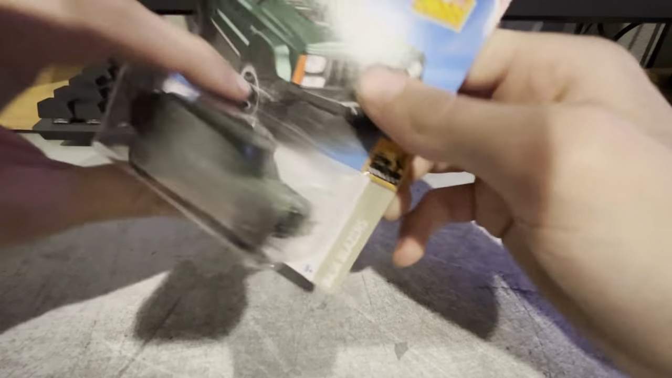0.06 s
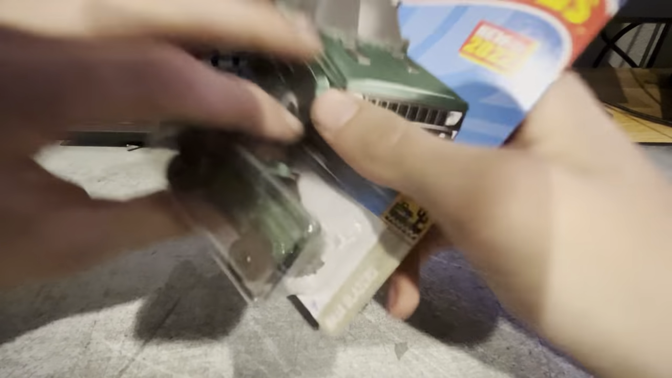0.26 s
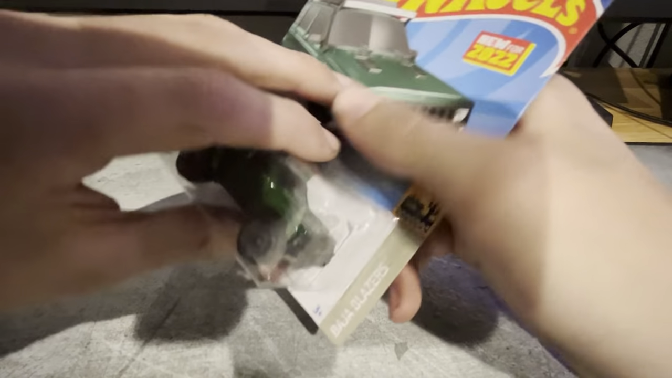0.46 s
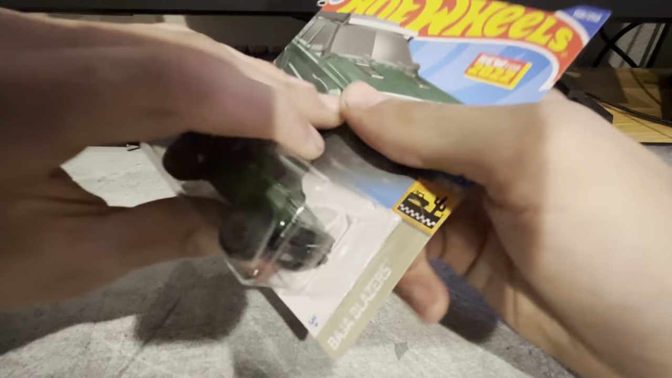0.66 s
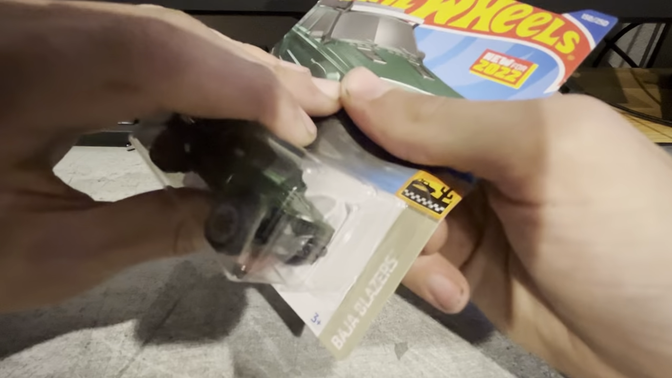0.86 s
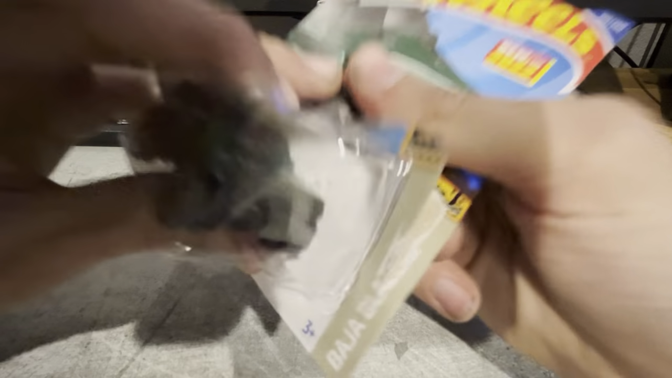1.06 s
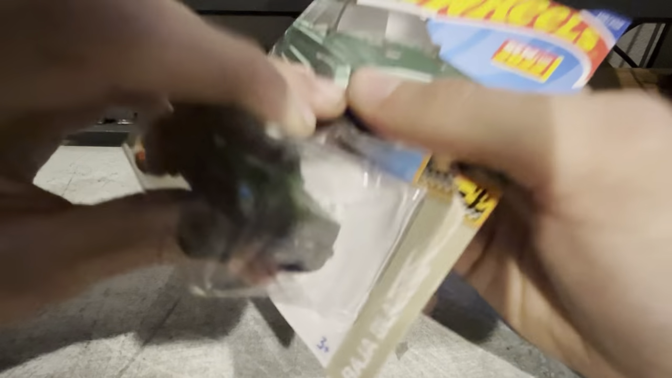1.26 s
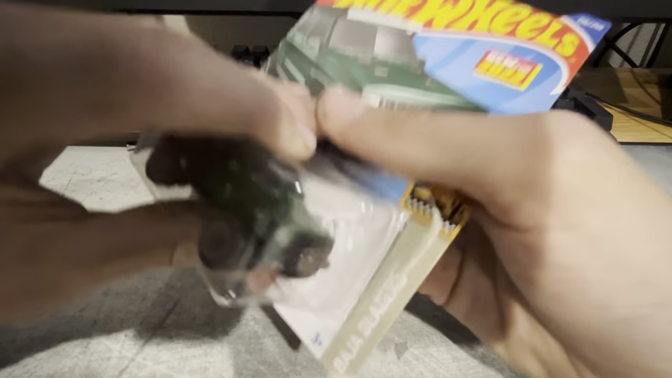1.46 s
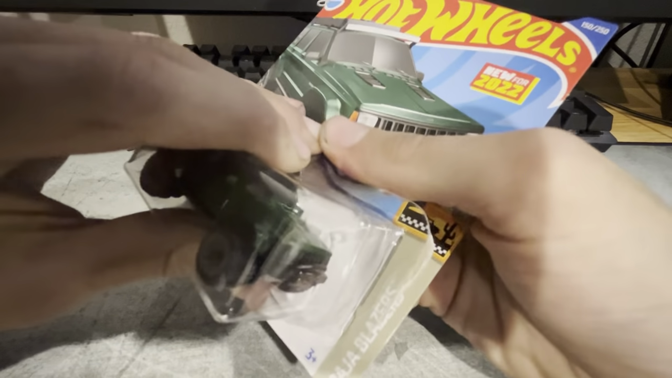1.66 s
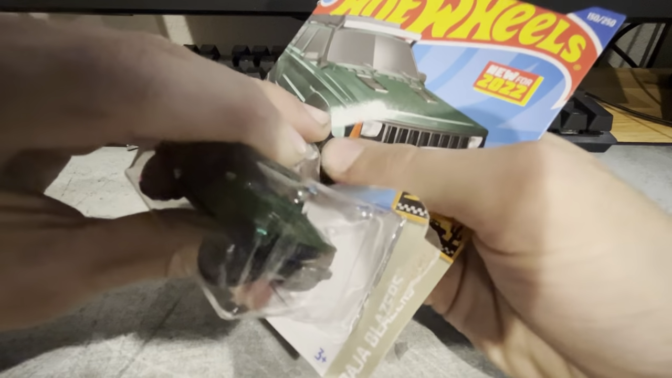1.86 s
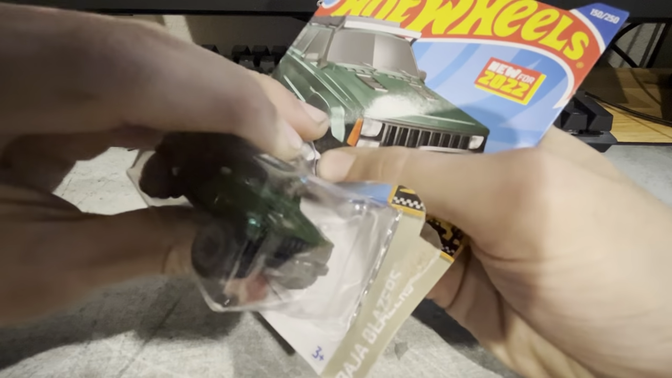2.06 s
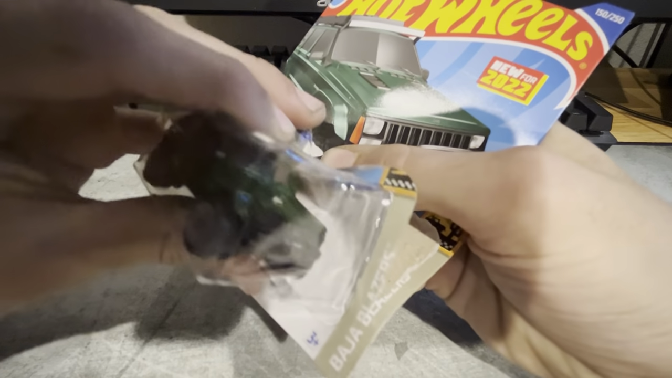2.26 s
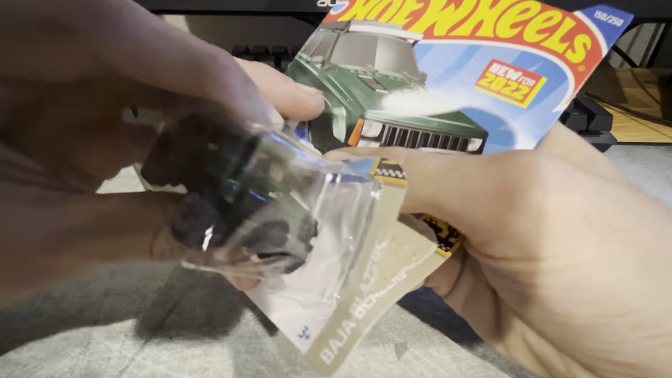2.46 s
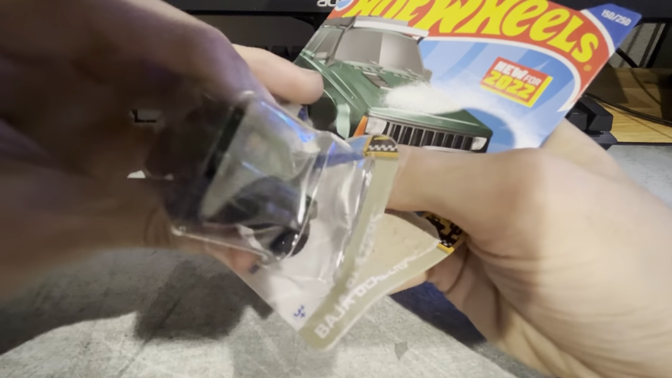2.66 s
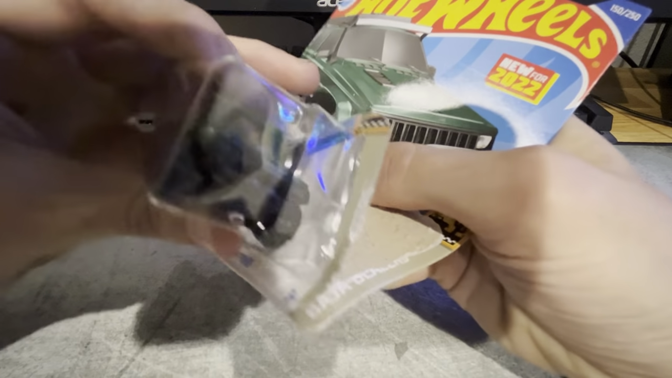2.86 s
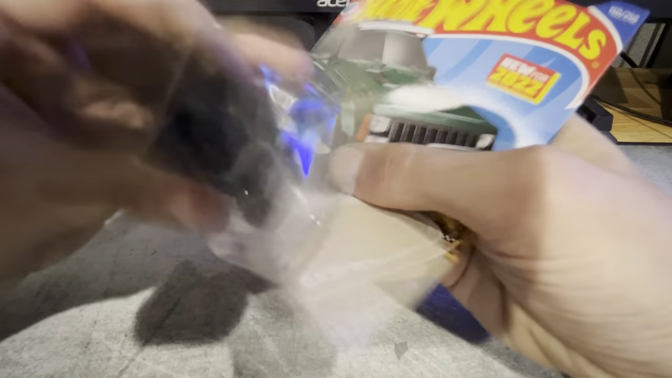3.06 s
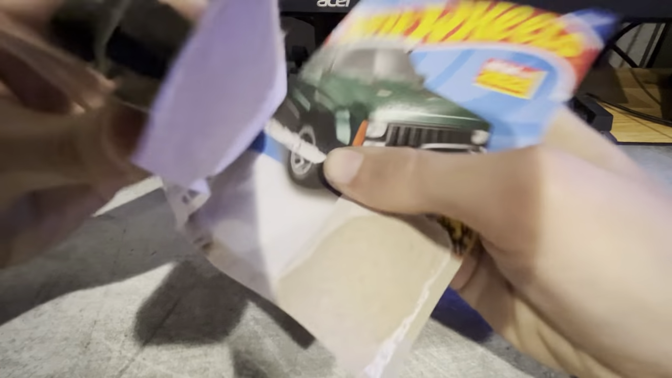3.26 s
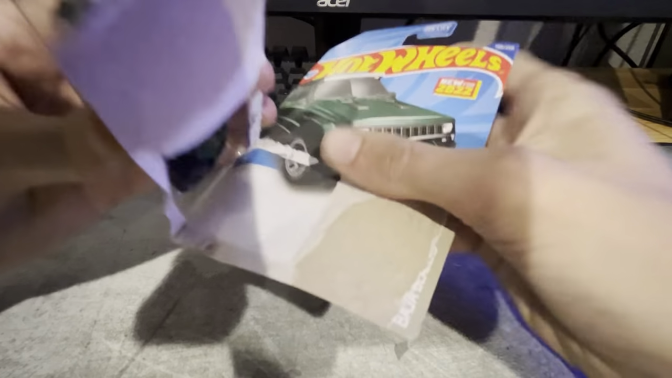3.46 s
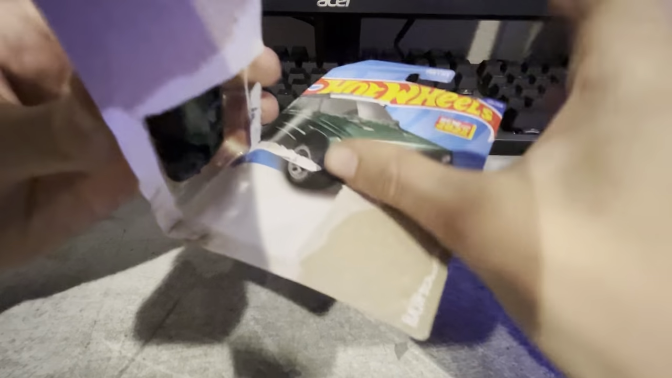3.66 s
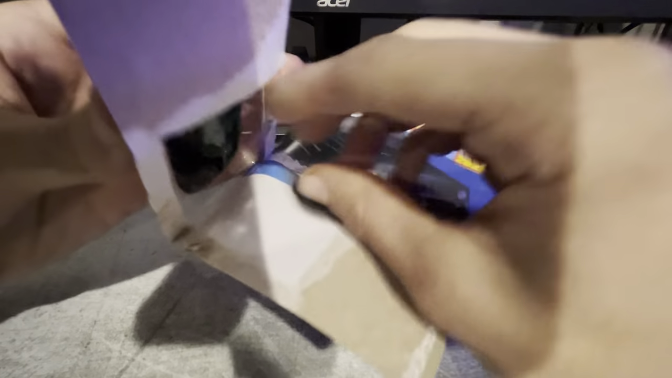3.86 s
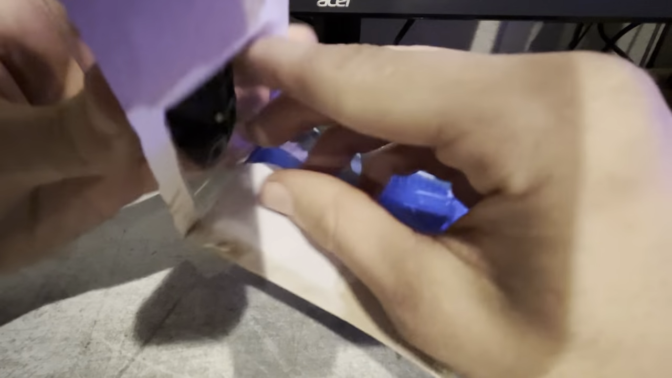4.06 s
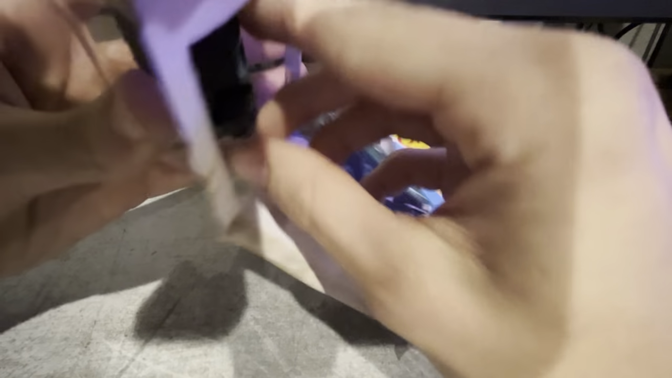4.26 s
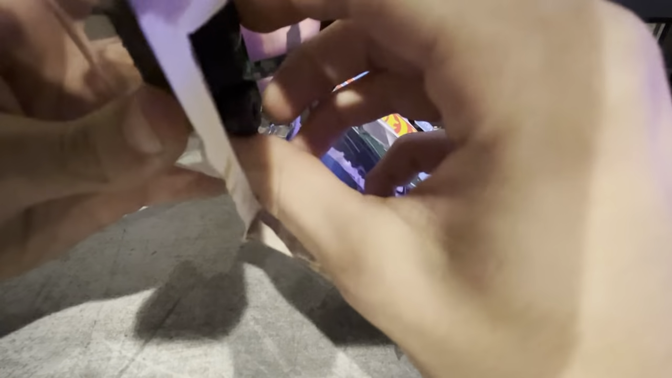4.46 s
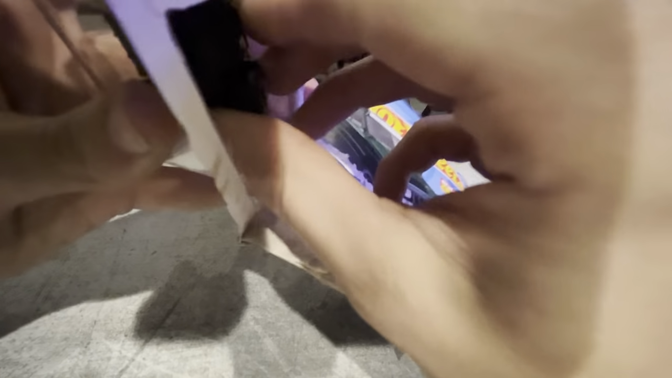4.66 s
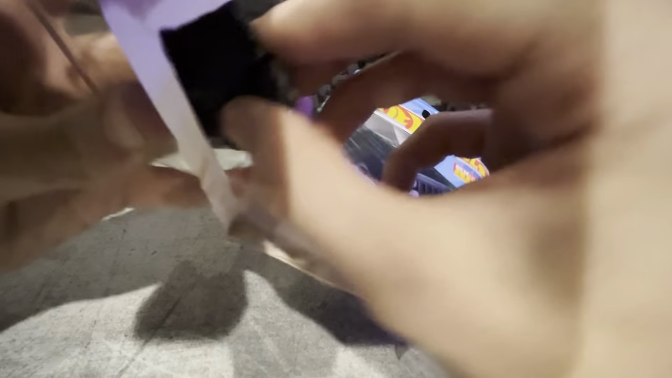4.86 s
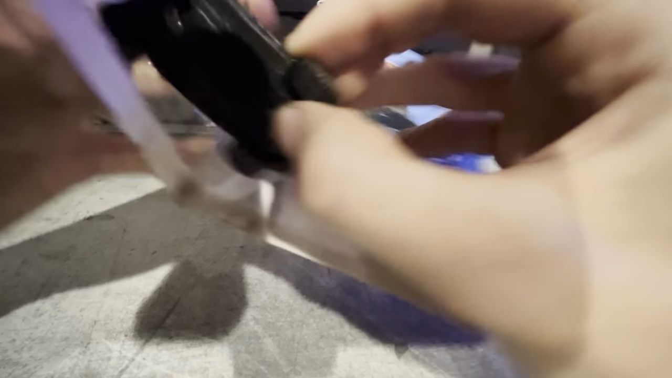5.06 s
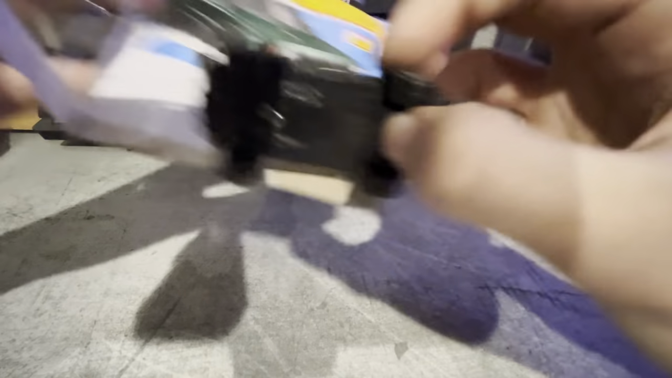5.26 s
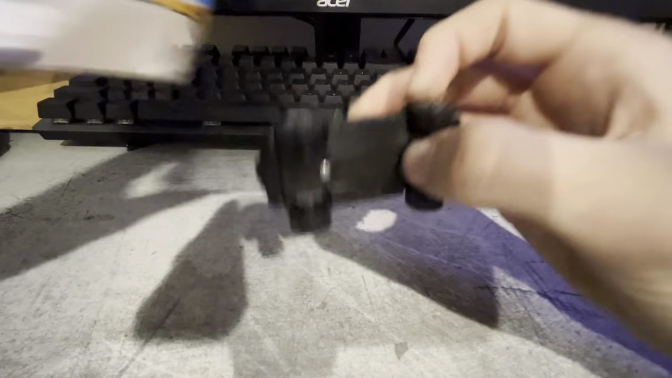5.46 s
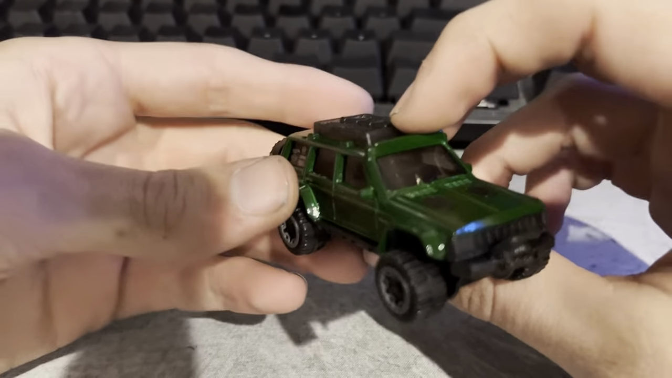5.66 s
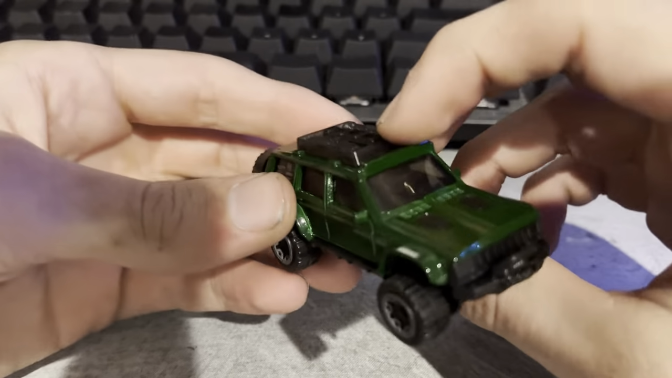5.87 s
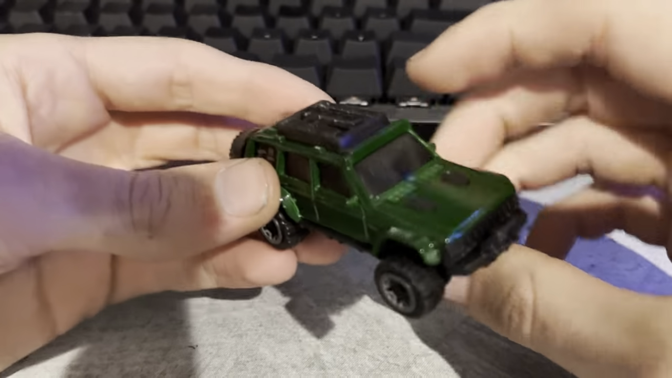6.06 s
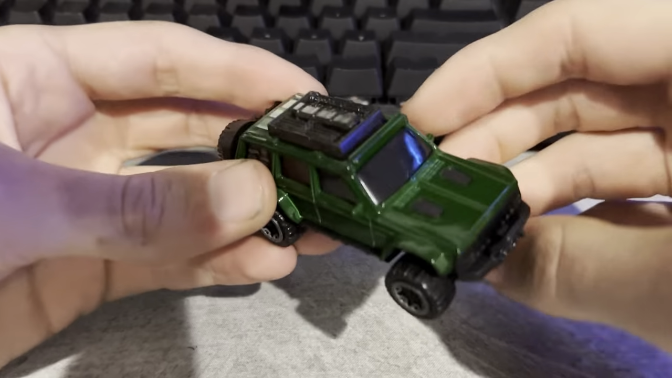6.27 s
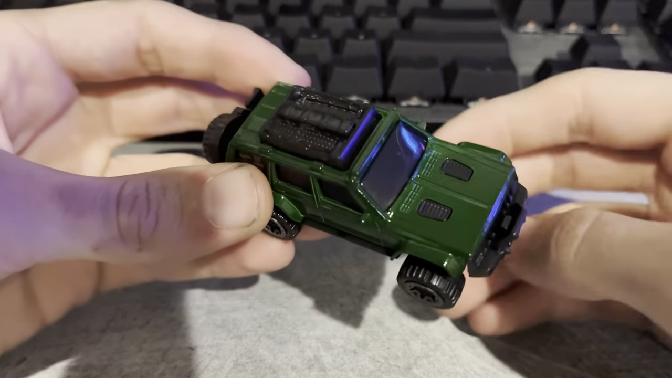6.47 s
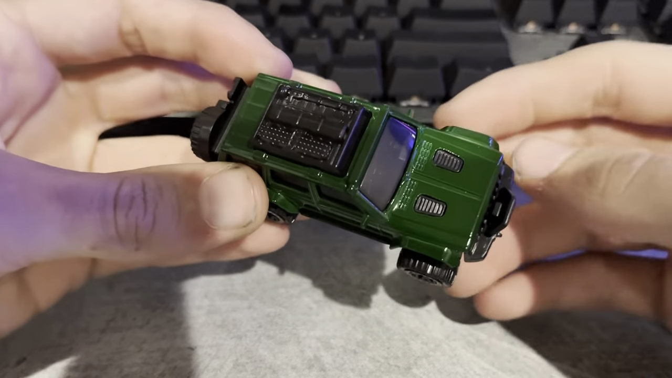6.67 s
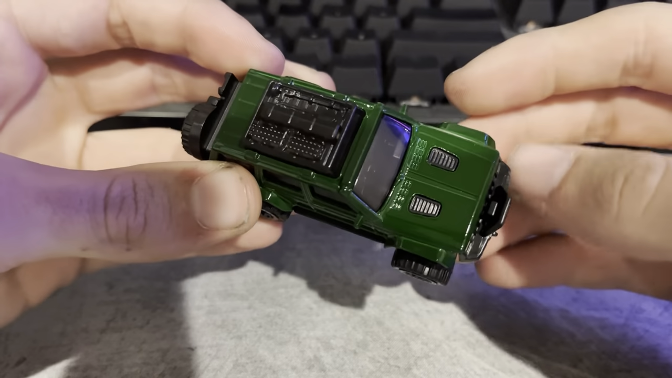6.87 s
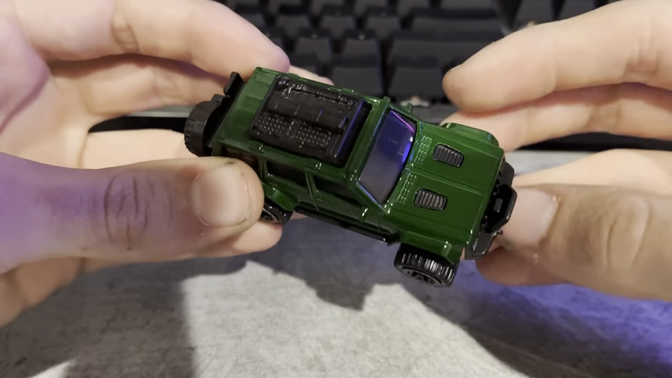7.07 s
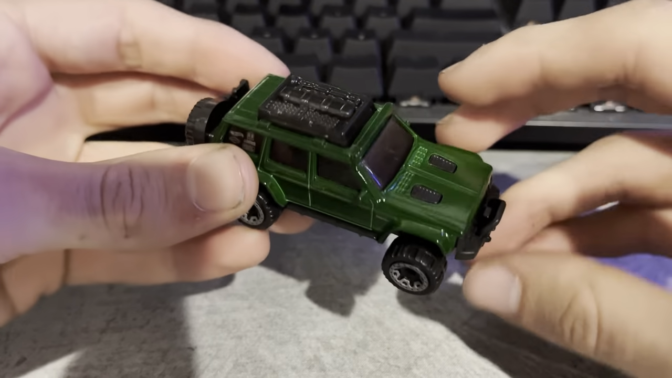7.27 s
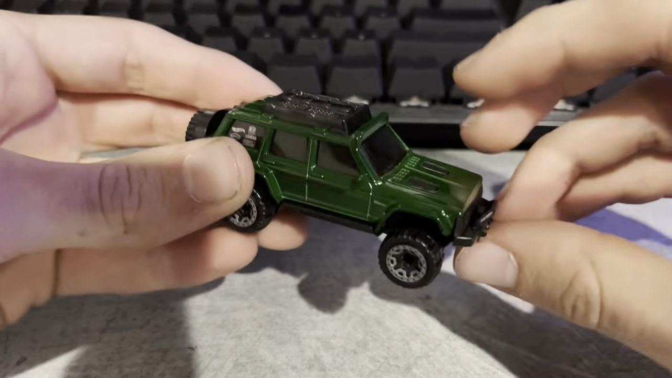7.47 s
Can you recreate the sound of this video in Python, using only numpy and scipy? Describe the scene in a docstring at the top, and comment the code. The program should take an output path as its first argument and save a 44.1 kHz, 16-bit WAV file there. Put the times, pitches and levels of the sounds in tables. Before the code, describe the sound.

Close up at a desk in a quiet room, hands rub and flex a stiff plastic blister on card. Crackles begin around one second, peak in loud snaps and a rip near three seconds, then come as scattered pops with rustling until five. Soft low knocks sit beneath. After a tiny dip in level, a small toy car is turned almost silently, with faint ticks and a light wheel rattle.

```python
"""First fingers rub a plastic blister pack and rip its glue seam: noise grains drive moving shell and card modes.
Over this come knocks with a sagging pitch and snaps: flurries of noise slips ringing a stiff shell and a dull card.
Around 5.6 s the level dips briefly; then a small toy is turned in the fingers, with soft touches, ticking axles
and a rattling wheel, while a few faint snaps go on. From start to end a quiet room rumbles and hisses below
a very faint steady tone. The near sources reach two microphone ports and leave a short dull tail."""
import sys
import numpy as np
from scipy import signal
from scipy.fft import rfft, irfft, next_fast_len
from scipy.io import wavfile
from scipy.ndimage import uniform_filter1d

SR = 44100
rng = np.random.default_rng(int(sys.argv[2]) if len(sys.argv) > 2 else 0)


def log_audio(samples):
    """Write samples as a 16-bit WAV file to the path given in sys.argv[1]."""
    # one column per channel
    frames = np.atleast_2d(samples).T
    # limit to full scale, then quantise
    limited = np.clip(frames, -1, 1)
    pcm = np.round(limited * 32767).astype(np.int16)
    wavfile.write(sys.argv[1], SR, pcm)


N = 331091  # length [samples]

# creases giving way: (flurry peak time [s], crack level [dB], card level [dB], main card mode [Hz],
# fizz level [dB], left minus right of crack and card [dB], flurry stretch [x 0.96 ms, held to 0.2-6])
SNAPS = [(0.454, -57, -40, 480, -92, -8, 0.92), (0.7248, -35, -64, 1030, -33.5, 6.5, 1.14),
         (0.9079, -56, -51, 828, -36.5, -0.5, 6.2), (1.0062, -9.5, -24.5, 1232, -10.5, -21.5, 2.3),
         (1.034, -31.5, -12.5, 814, -49, 4, 0.58), (1.0612, -35, -33, 1220, -30, -4.5, 2.9),
         (1.1713, -21.5, -16.5, 790, -75, 4, 0.93), (1.1781, -16.5, -80, 796, -13.5, 2, 0.63),
         (1.2785, -50, -32.5, 830, -55, -12, 2.6), (1.3438, -33.5, -23, 860, -38.5, 0, 4.4),
         (1.361, -27, -17.5, 770, -76, -2, 1.3), (1.3906, -40, -19, 846, -73, -5, 1.8),
         (1.4486, -41, -36, 905, -47, -6, 1.5), (1.4755, -23.5, -15.5, 900, -45, -1, 1.1),
         (1.4813, -21, -19, 900, -23, -7, 0.77), (1.4869, -16.5, -18.5, 813, -34, 12, 0.78),
         (1.66, -40, -20, 820, -42, -4.5, 1.5), (1.6994, -32.5, -35, 740, -31.5, 3, 2.2),
         (1.7054, -44, -15, 810, -33, -11, 0.24), (1.753, -30, -53.5, 700, -41, -0.5, 0.96),
         (1.769, -27, -28, 1055, -34, -6, 1.2), (1.7895, -13.5, -21.5, 1170, -19.5, -5, 0.4),
         (1.795, -20.5, -22, 720, -18.5, -2, 2.4), (1.882, -23, -14.5, 676, -26.5, -4, 1.3),
         (1.991, -40, -60, 1360, -34.5, 4, 3.5), (2.0512, -37, -40, 1410, -24.5, 5, 1.7),
         (2.097, -37, -42, 470, -45, -7, 1.5), (2.107, -41, -39, 900, -41, -3, 1.1),
         (2.146, -41, -48, 900, -36, -6, 3.7), (2.173, -55, -41, 470, -50, -11, 1.2),
         (2.2025, -35.5, -37, 1190, -39, -3.5, 1.8), (2.2235, -35, -49, 1340, -31, 3, 0.97),
         (2.25, -43, -45, 1100, -33, 14, 0.33), (2.266, -42, -42, 440, -44, -5, 1.5),
         (2.2818, -44, -47, 820, -28, 17, 1.7), (2.297, -42, -50, 900, -30.5, -2, 1.1),
         (2.329, -37, -51, 1000, -36, -7, 1.8), (2.358, -37, -40, 1050, -34, -4, 1.6),
         (2.3728, -33, -39, 1030, -40, -12, 0.83), (2.3851, -47, -34, 1050, -31, -7, 0.35),
         (2.413, -57, -63, 900, -36, 0, 0.54), (2.54, -32, -28.5, 440, -37, 28, 9),
         (2.5474, -15, -24.5, 500, -22.5, -1, 0.67), (2.561, -21, -28, 876, -20.5, -4, 1.2),
         (2.6087, -16.5, -35.5, 389, -17, 1, 2.2), (2.72, -42, -36, 1050, -52, -3.5, 2.3),
         (2.739, -52, -44, 1000, -43, 2.5, 1.1), (2.766, -39, -46, 1000, -36, 0, 1.1),
         (2.778, -31, -49.5, 1000, -38, 12, 1), (2.7888, -36, -46.5, 1035, -35, -8, 6.8),
         (2.8294, -10, -10.5, 959, -26, -1.5, 1.15), (2.908, -36.5, -51, 900, -34.5, 12, 1),
         (2.9854, -15.5, -13, 1173, -23.5, 3.5, 1.45), (3.006, -43, -18, 887, -42.5, 8.5, 7.5),
         (3.0193, -13, -14.5, 610, -24.5, 6.5, 1.8), (3.0513, -15.5, -2.5, 710, -11, -1, 1.56),
         (3.0595, -26.5, -21, 620, -28, 13.5, 2.5), (3.0775, -27, -24.5, 700, -31.5, 7.5, 2.4),
         (3.0875, -21.5, -17.5, 851, -19.5, -0.5, 0.62), (3.092, -18.5, -19.5, 1150, -27, -9.5, 2),
         (3.099, -26, -27.5, 800, -31, -3.5, 2), (3.111, -34.5, -26, 680, -34.5, -4, 3.1),
         (3.209, -63.5, -37, 709, -64.5, -11.5, 1.3), (3.28, -12.5, -10, 819, -24, -12.5, 1.2),
         (3.292, -10.5, -15, 880, -15, 2, 0.87), (3.317, -44, -28.5, 760, -47, 4.5, 1.2),
         (3.3457, -10, -15, 800, -22.5, 9.5, 1.15), (3.349, -23.5, -15, 790, -37, -6.5, 1.4),
         (3.394, -35, -38, 690, -58, 1, 2.9), (3.5146, -30.5, -25, 1090, -34.5, -3.5, 6.5),
         (3.551, -29, -30, 1020, -46.5, 1.5, 3.5), (3.5891, -7, -16.5, 900, -10, 3.5, 1.6),
         (3.633, -39, -34, 1490, -47, 1, 4.2), (3.835, -43, -35, 681, -47, 6, 1.6),
         (3.8546, -38.5, -29.5, 480, -45, -4.5, 3.3), (3.913, -35, -27.5, 830, -40, 0, 7.1),
         (3.937, -30, -26, 905, -35, 1, 6.6), (3.994, -54, -37.5, 711, -56, 0, 0.64),
         (4.011, -48.5, -60, 800, -43, 0, 1.2), (4.077, -33.5, -47.5, 800, -36.5, 1.5, 1),
         (4.0631, -9.5, -11.5, 801, -24.5, 0.5, 1.9), (4.1105, -32.5, -28.5, 1040, -31.5, -1, 1.4),
         (4.1366, -9.5, -38.5, 784, -7.5, 3, 0.74), (4.1582, -31.5, -21, 877, -52.5, 2, 1.3),
         (4.2313, -37, -31.5, 1070, -35.5, 7.5, 5.7), (4.2932, -32.5, -43, 856, -34.5, -1, 0.7),
         (4.3544, -41, -45, 1090, -47, -1, 4.6), (4.404, -34, -28.5, 796, -45, 11, 1.9),
         (4.486, -46, -35, 807, -50, -4, 3.4), (4.613, -43, -33, 790, -58, 0.5, 3.7),
         (4.772, -51, -57, 1010, -53, -1, 1.3), (4.8105, -50, -61, 600, -49, 8, 2.3),
         (4.857, -46, -35.5, 790, -47.5, 1.5, 1.9), (4.9496, -12, -29.5, 1370, -18.5, 0.5, 1.3),
         (4.9562, -24, -23, 760, -45.5, 0, 3.3), (4.987, -24.5, -52.5, 390, -37.5, 25.5, 2.2),
         (5.005, -9.5, -15, 672, -15, 0, 0.95), (5.011, -31.5, -18.5, 1592, -44, -11.5, 1.3),
         (5.05, -41, -30.5, 773, -48, -6, 2), (5.0745, -35.5, -42, 1590, -41, 0, 2.6),
         (5.097, -40, -82, 754, -42.5, 1, 4.5), (5.221, -47, -49, 1660, -50, -2, 2.1),
         (5.248, -56, -47, 1130, -62, -6, 1.5), (5.269, -45.5, -59, 1200, -58, 0, 1.8),
         (5.282, -52, -37.5, 1170, -50, 7, 3.9), (5.348, -50, -52, 1730, -60, 3, 2.3),
         (5.371, -52, -58, 1600, -65, 5, 2), (5.4775, -66, -75, 386, -63, 3.5, 0.75),
         (5.525, -59.5, -62, 600, -58, -3, 1.16), (5.5772, -60, -64, 384, -51.5, -15, 1.02),
         (5.6844, -71, -72, 391, -63.5, -5, 1.8), (6.0009, -66.5, -76, 395, -59, -11.5, 0.68),
         (6.8093, -73, -61.5, 1390, -56, -13.5, 1.9), (6.8295, -63.5, -73, 460, -57, -2, 1.7),
         (7.3772, -66, -62.5, 1330, -62.5, -8, 1.3)]
# stiff plastic shell, three lower then four upper modes: (pitch [Hz], damping width [Hz], relative level [dB])
SHELL_MODES = [(1524, 820, 4), (1966, 370, -5), (2267, 280, -3), (3260, 300, 1.5), (3970, 700, 4.5),
               (4565, 330, 4), (5056, 460, 2.5)]
# treble modes of the fizz: (pitch [Hz], damping width [Hz], relative level [dB])
FIZZ_MODES = [(6292, 1200, 5), (6724, 860, 2), (7400, 970, 1.5), (10080, 1700, 6), (12170, 1500, 6),
              (15300, 2000, -5.5)]
# card modes, all retuned so that the third meets the wanted pitch:
# (pitch before retuning [Hz], damping width [Hz], relative level [dB])
CARD_MODES = [(518, 100, -6), (680, 34, -11), (814, 135, 3.5), (1056, 110, -5), (1300, 288, -10),
              (340, 110, -8)]
# ripping and rubbing on the pack, ahead of the ports:
# (time [s], drive level [dB], card against level [dB], fizz against level [dB])
RUSTLE = [(0, -41.5, 7, -12.5), (0.031, -60.5, 1.5, -3), (0.098, -59, 1.5, -6), (0.158, -51, 12.5, 0.5),
          (0.286, -55, -3.5, -1.5), (0.368, -52.5, 7.5, -1.5), (.41, -72, 2, -8), (.46, -69.5, 23, -10),
          (0.511, -57.5, 9, -7), (.66, -56.5, 6, -6), (.71, -64.5, -6, -6), (0.799, -60, 0, 3),
          (0.898, -61.5, -7, 8), (.98, -59, 4, 19), (1.069, -43, -3.5, -15), (1.139, -54, -6, -7),
          (1.24, -51.5, -0.5, -5.5), (1.302, -44, 4, -1.5), (1.36, -49.5, 5, -4), (1.43, -62, -2, -10),
          (1.52, -49.5, 8, -4), (1.6, -54.5, -6, 5), (1.68, -46.5, -14, -3), (1.794, -38.5, 3.5, 5),
          (1.92, -55.5, -11, -5.5), (2.06, -45, -6.5, 6.5), (2.18, -45, -6.5, 0), (2.35, -45.5, -9, 3),
          (2.51, -48, -4.5, 4), (2.58, -39, -5.5, -3.5), (2.7, -43.5, -13.5, -0.5), (2.943, -45.5, -1, 0.5),
          (3.08, -29.5, -4.5, -1.5), (3.16, -54, 0, -6), (3.45, -49, -0.5, -3.5), (3.52, -45, 6, -6),
          (3.72, -53.5, -3, -10.5), (3.81, -60.5, 4.5, 3.5), (3.93, -49.5, 3.5, -6), (3.978, -51.5, 0, 0.5),
          (4.07, -50, -5, -3.5), (4.24, -46.5, 3.5, 1), (4.33, -54, 3, 0.5), (4.4, -54.5, 1, -1),
          (4.44, -62.5, 8, -1), (4.489, -49, 6.5, -7.5), (4.641, -55.5, 0.5, -1), (4.69, -68.5, 0, -1),
          (4.76, -67, 2, -2), (4.82, -54, 1.5, -3.5), (5, -48.5, 2.5, -11.5), (5.17, -59, -5.5, -6.5),
          (5.28, -57, -4, 0), (5.361, -57.5, 2, -6), (5.39, -63.5, 0, 2), (5.49, -73, 0.5, -6),
          (5.6, -66.5, -2, -2.5)]
# main card mode in the rustle, moving as the grip bends and shortens the card: (time [s], pitch [Hz])
CARD_PITCH = [(0, 620), (.42, 635), (.5, 910), (.7, 810), (1.9, 780), (2.06, 530), (2.29, 530),
              (2.34, 1060), (2.5, 915), (2.7, 960), (3.0, 990), (3.08, 757), (3.42, 820), (3.5, 1010),
              (3.57, 1040), (3.62, 900), (4.599, 811), (5.06, 772), (5.18, 1500), (5.38, 1570),
              (5.601, 1160)]
# fingers sliding on the toy, ahead of the ports:
# (start [s], length [s], drive level [dB], card quieter by [dB])
TOUCHES = [(5.799, .02, -76, 7.5), (5.992, 0.027, -60, 26), (6.13, 0.11, -63.5, 13),
           (6.426, 0.042, -73.5, -4.5), (6.611, 0.08, -72.5, 8.5), (6.802, 0.17, -87, 5.5),
           (7.356, 0.046, -79, -2.5)]
# a loose wheel turning and rattling on its axle: (time [s], drive level ahead of rattle and ports [dB])
WHEEL = [(6.8, -95), (6.812, -67.5), (6.835, -84), (6.89, -87), (6.916, -97.5), (6.965, -75), (7.02, -94),
         (7.045, -94), (7.08, -81), (7.105, -90.5)]
# wheels and axles ticking: (time [s], peak level ahead of the ports [dB], main axle mode [Hz])
TICKS = [(5.9094, -63.5, 2560), (5.9963, -50, 4450), (6, -54, 5400), (6.1144, -68, 4470),
         (6.809, -51.5, 3370), (6.83, -51, 4420), (7.1997, -65.5, 4180), (7.3758, -61, 4710)]
# axle modes, retuned for each tick so that the first meets its pitch:
# (pitch before retuning [Hz], damping width [Hz], relative level [dB])
AXLE_MODES = [(3465, 200, 3.5), (4200, 390, -9.5), (3050, 110, -11)]
# hands and card knocking the desk:
# (time [s], right level ahead of the rise and decay [dB], pitch it sags to [Hz], left minus right [dB])
THUMPS = [(0.155, -31, 146, -7.5), (1.013, -30, 77.5, -14.5), (1.803, -27.5, 77.8, -14),
          (2.565, -29, 82, -10.5), (2.613, -31.5, 68, -14), (3.042, -24.5, 120, 2.5),
          (3.274, -37, 144.4, -9.5), (3.54, -30, 106.2, -4), (3.592, -30, 90, -9),
          (3.931, -41.5, 113.3, -5.5), (4.225, -38, 91, 8), (5.041, -35.5, 82.8, -9), (6.455, -33, 79, 0)]
# phase between the ports for the near sources: (frequency [Hz], left leads by [rad])
PORT_PHASE = [(60, -.1), (340, -2.2), (1000, -2.8), (2000, -2.0), (5000, -1.5), (8800, -.3), (9300, .7),
              (10000, 1.2), (10500, 2.0), (11400, 2.0), (12500, 3.14), (14000, 4.4), (15800, 6.2)]
# balance between the ports for the near sources: (frequency [Hz], left minus right [dB])
PORT_BALANCE = [(60, -3), (200, -5.5), (700, -5), (1290, -3), (2380, 1), (3300, -6), (4400, -10),
                (5600, -7), (8120, -1), (15000, 0)]
# likeness of what reaches the two ports: (frequency [Hz], likeness [-1 to 1])
PORT_LIKENESS = [(100, .7), (1000, .75), (2200, .6), (3000, .4), (7500, .35), (9500, .9), (12500, .99),
                 (16000, .92)]
# spectrum of the room, scaled as a whole later: (frequency [Hz], relative density [dB])
ROOM_SPECTRUM = [(15, -40.5), (25, -13), (70, 1.5), (256, -9.5), (326, -10.5), (531, -19.5), (988, -42),
                 (1700, -42.5), (3160, -46.5), (4250, -45.5), (6380, -53.5), (9070, -42), (12200, -62.5),
                 (14800, -51), (16000, -56.5)]
# likeness of the room in left and right: (frequency [Hz], likeness [-1 to 1])
ROOM_LIKENESS = [(60, 0.9), (180, 0.12), (550, 0.52), (1650, -0.01), (4970, 0.71), (15000, 0.14)]
# faint steady tone: (pitch [Hz], rms level [dB])
TONES = [(1701, -99)]
# brief dip of the level: (centre [s], half width to 1/e of the depth [s], gain at the centre [dB])
DIP = (5.607, .012, -20)

LEAD_S = .008  # room left for the build-up of a snap
TAUT_DB, TAUT_PER_DB = 1, 0.23  # a snap with more fizz than card comes from a tauter shell
RUSTLE_TAUT_DB, RUSTLE_TAUT_PER_DB = -1, 0.41  # the same for the rustle
RIP_DB, RIP_T60_S = -33.5, 0.25  # the seam ripping on after a snap: level against the crack, decay
STRAIN_DB, STRAIN_T60_S = -22.5, 0.037  # the shell creaking louder before it gives: same units
TOUCH_EDGE_S = 0.022  # rise and fall of a touch
HOLD_DB = -84  # drive level of just holding the toy
TICK_BURST_S = 0.0012  # decay of the slips in a tick
THUMP_PHASE_PER_DB = -1.2  # left phase offset [rad] per dB of left minus right
ROOM_DB = -58.5  # rms level of the room
EDGE_HZ = 16500  # band limit


def snaps():
    """Creases in the pack give way one after another, each with its own chance."""
    out = np.zeros((2, N))
    chance = rng.standard_normal((len(SNAPS), 4, 1500))
    for (s, *row), own in zip(SNAPS, chance):
        add(out, s - LEAD_S, snap(*row, own))
    return out


def snap(crack_db, card_db, card_hz, fizz_db, pan_db, stretch, chance):
    """A crease gives way in a short flurry of slips that rings shell and card."""
    t = np.arange(len(chance[0])) / SR - LEAD_S
    u = t / (0.00096 * np.clip(stretch, .2, 6))
    flurry = np.where(u < 0, np.exp(1.16 * u), np.exp(-.75 * u))  # slips gather, peak and die away
    slips = chance[:2] * gain_of(2.7 * chance[2]) * flurry
    # the card flips and springs back as the flurry gathers
    v = (t + 0.00055) * card_hz / 0.24
    kick = 1.5 * np.array([v, .5 - v ** 2]) * np.sign(chance[2, 0]) * np.exp(-v ** 2)

    taut_db = TAUT_DB + TAUT_PER_DB * (fizz_db - card_db)
    crack = shell(slips, taut_db, creased(SHELL_MODES, chance[3]), ring)
    fizz = ring(slips * flurry ** 0.38, creased(FIZZ_MODES, chance[2]))
    card = ring(kick + 0.55 * slips, tuned(CARD_MODES, card_hz / CARD_MODES[2][0]))

    side = gain_of([[pan_db / 2], [-pan_db / 2]])  # the fizz is left unpanned
    parts = ((ports(crack) * side, crack_db), (ports(fizz), fizz_db), (ports(card) * side, card_db))
    mix = 0
    for x, db in parts:
        loudest = np.sqrt(uniform_filter1d((x ** 2).mean(0), size=88).max())  # rms of the loudest 2 ms
        mix = mix + gain_of(db) * x / loudest
    return mix


def creased(modes, chance):
    """Every crease lies elsewhere, so it detunes the modes and excites them unevenly."""
    return [(hz * (1 + .04 * a), w, db + 2.5 * b)
            for (hz, w, db), a, b in zip(modes, chance, chance[::-1])]


def shell(x, taut_db, modes, through):
    """A taut shell rings in its upper modes, a slack one in its lower modes."""
    upper, lower = through(x, modes[3:]), through(x, modes[:3])
    return (gain_of(taut_db) * upper + 1.014 * lower) / np.sqrt(gain_of(2 * taut_db) + .5)


def rustle():
    """Skin and torn fibres hiss; tiny creases crackle in clumps through the same shell and card."""
    level_db, card_db, fizz_db = effort()
    taut_db = RUSTLE_TAUT_DB + RUSTLE_TAUT_PER_DB * (fizz_db - card_db)
    slips, flexes = rng.standard_normal((2, 2, N))
    force = np.clip((level_db + 73.0) / 35.0, .1, 1)  # light strokes brush smoothly, hard pulls crackle
    swells = evened(uniform_filter1d(rng.standard_normal((3, N)), size=500))
    clumps = gain_of(2.9 * force * swells)
    grains = 0.58 + 0.55 * force * crackle(per_s=900, spread_db=4.5, slip_s=0.0006)
    creaks = 0.7 + .45 * force * crackle(per_s=220, spread_db=2.5, slip_s=0.0018)
    bent = np.interp(np.arange(N) / SR, *np.transpose(CARD_PITCH)) / CARD_MODES[2][0]

    def fingered(x, modes):
        """Shell modes under moving fingers."""
        return handled(x, modes, wander_db=2.5)

    body = shell(slips * grains * clumps[0], taut_db, SHELL_MODES, fingered)
    fizz_drive = slips * grains * np.sqrt(clumps[0] * clumps[1])
    fizz = handled(fizz_drive, FIZZ_MODES, wander_db=2.5, damp=0.85)
    card_drive = flexes * creaks * clumps[2]
    card = handled(card_drive, CARD_MODES, wander_db=3.5, drift=0.05, tune=bent, damp=2.1)
    return gain_of(level_db) * (body + gain_of(fizz_db) * fizz + gain_of(card_db) * card)


def effort():
    """Level, card and fizz of the rustle: the pull, the touches, and strain and rip around each snap."""
    t = np.arange(N) / SR
    s, pull_db, *colour = np.transpose(RUSTLE)
    power = gain_of(2 * np.interp(t, s, pull_db, right=HOLD_DB))  # doubled dB gives power
    card_db, fizz_db = (np.interp(t, s, c) for c in colour)
    for start, length, db, quiet_db in TOUCHES:
        inside_s = np.minimum(t - start, start + length - t)
        touch = np.clip(inside_s / TOUCH_EDGE_S + .5, 0, 1)
        power = power + gain_of(2 * db) * touch ** 2
        card_db = card_db - quiet_db * touch
    cracks = np.zeros(N)
    for at, crack_db, *_ in SNAPS:
        cracks[round(at * SR)] = gain_of(2 * crack_db)
    power = power + gain_of(2 * RIP_DB) * dying(cracks, RIP_T60_S)
    # run backwards, the decay becomes a build-up
    power = power + gain_of(2 * STRAIN_DB) * dying(cracks[::-1], STRAIN_T60_S)[::-1]
    return 10 * np.log10(power), card_db, fizz_db


def dying(power, t60_s):
    """Lets power die away by 60 dB in t60_s."""
    return signal.lfilter([1], [1, -gain_of(-2 * 60 / (t60_s * SR))], power)


def handled(x, modes, wander_db, drift=.04, tune=1, damp=1.7):
    """Moving fingers alter the damping, mute now one mode, now another, and push each up and down in pitch."""
    at = np.arange(0, N + 900, 900)
    chance = rng.standard_normal((2, len(modes), len(at)))
    wander = evened(uniform_filter1d(chance[0], size=3))
    bend = evened(uniform_filter1d(chance[1], size=7))
    out = np.zeros(x.shape)
    for k, ((hz, w, db), own, pull) in enumerate(zip(modes, wander, bend)):
        pitch = hz * tune * (1 + drift * np.interp(np.arange(N), at, pull))
        turn = np.exp(2j * np.pi * np.cumsum(pitch) / SR)
        r = np.exp(-2 * np.pi * damp * w / SR)
        # shift the moving mode down to 0 Hz, resonate there, shift back up
        rung = (turn * signal.lfilter([1], [1, -2 * r, r * r], x / turn)).real
        unit = np.sqrt(2 * (1 - r * r) ** 3 / (1 + r * r))  # evens loudness across dampings
        level = gain_of(db + wander_db * np.interp(np.arange(N), at, own))
        out += (-1) ** k * level * unit * rung
    return out / np.linalg.norm(gain_of([db for hz, w, db in modes]))


def crackle(per_s, spread_db, slip_s):
    """An envelope of small slips at random moments, a few of them large, each dying away over slip_s."""
    size = gain_of(spread_db * np.minimum(rng.exponential(1, N), 4))
    starts = size * (rng.random(N) < per_s / SR)
    return evened(signal.oaconvolve(starts, np.exp(-np.arange(400) / SR / slip_s))[:N])


def ticks():
    """A short puff of slips rings the axle, tuned to each tick."""
    out, t = np.zeros((2, N)), np.arange(900) / SR
    chance = rng.standard_normal((len(TICKS), 2, 900))
    for (s, db, pitch_hz), own in zip(TICKS, chance):
        puff = own * np.exp(-t / TICK_BURST_S)
        tick = ring(puff, tuned(AXLE_MODES, pitch_hz / AXLE_MODES[0][0]))
        add(out, s, gain_of(db) * tick / abs(tick).max())
    return out


def wheel():
    """Rubbing and uneven little taps ring the axle."""
    s, db = np.transpose(WHEEL)
    level = gain_of(np.interp(np.arange(N) / SR, s, db, -150, -150))
    drive = 1.3 + 0.99 * crackle(per_s=150, spread_db=0.0, slip_s=0.0012)
    return ring(level * drive * rng.standard_normal((2, N)), AXLE_MODES)


def thumps():
    """Low soft knocks: decaying sines whose pitch sags."""
    out, t = np.zeros((2, N)), np.arange(6000) / SR
    for s, db, hz, pan_db in THUMPS:
        turns = 2 * np.pi * hz * (t + .003 * (1 - np.exp(-t / .01)))  # starts 30 % sharp
        swell = gain_of(db - 60 * t / .13) * (1 - np.exp(-t / .005))
        phase = [[THUMP_PHASE_PER_DB * pan_db], [0]]
        add(out, s, swell * np.sin(turns + phase) * gain_of([[pan_db], [0]]))
    return out


def ports(x):
    """Each port hears its own blend of the near source, with its own phase and level, and little bass."""
    size = next_fast_len(x.shape[1] + 500)
    hz = np.fft.rfftfreq(size, 1 / SR)
    # half the difference goes to each port
    half = gain_of(read(PORT_BALANCE, hz) / 2) * np.exp(.5j * read(PORT_PHASE, hz))
    heard = pair(*rfft(x, size), read(PORT_LIKENESS, hz)) * [half, 1 / half]
    bass_cut = hz ** 2 / (hz ** 2 + 95.0 ** 2)
    return irfft(heard * bass_cut, size)[:, :x.shape[1]]


def desk(x):
    """Desk and walls throw back a short dull tail: smoothed noise falling 60 dB in 0.23 s."""
    t = np.arange(5000) / SR
    tail = rng.standard_normal((2, len(t))) * gain_of(-60 * t / 0.23) * (t > .003)
    tail = uniform_filter1d(tail, size=4)
    return gain_of(-23.5) * signal.oaconvolve(x, tail / np.linalg.norm(tail[0]), axes=1)[:, :N]


def room():
    """Steady rumble and hiss: noise shaped in the spectrum, with drifting patches."""
    frames, hz = N // 256 + 5, np.fft.rfftfreq(1024, 1 / SR)
    a, b, c, d, patches = rng.standard_normal((frames, 513, 5)).T
    patches = uniform_filter1d(uniform_filter1d(patches, 6, 0), 10, 1)  # over frequency, then time
    z = pair(a + 1j * b, c + 1j * d, read(ROOM_LIKENESS, hz)[:, None])
    z *= gain_of(read(ROOM_SPECTRUM, hz)[:, None] + 1.5 * evened(patches))
    noise = signal.istft(z, nperseg=1024, noverlap=768)[1][:, :N]
    return gain_of(ROOM_DB) * evened(noise)


def faint_tone():
    """A steady sine, equal in both channels."""
    t = np.arange(N) / SR
    return sum(gain_of(db) * np.sqrt(2) * np.sin(2 * np.pi * hz * t) for hz, db in TONES)


def gain_of(db):
    """Decibels to gain."""
    return 10 ** (np.asarray(db) / 20)


def evened(x):
    """Scales to rms 1."""
    return x / np.sqrt(np.mean(x ** 2) + 1e-20)


def read(points, hz):
    """Reads a table on a log-frequency axis."""
    f, value = np.transpose(points)
    return np.interp(np.log(hz + 1), np.log(f + 1), value)


def add(mix, s, sound):
    """Mixes a two-channel sound in at time s."""
    part = mix[:, max(round(s * SR), 0):][:, :sound.shape[1]]
    part += sound[:, :part.shape[1]]


def tuned(modes, ratio):
    """Moves all modes in pitch by one ratio."""
    return [(hz * ratio, w, db) for hz, w, db in modes]


def ring(x, modes):
    """Passes x through damped modes with a soft start."""
    t = np.arange(512) / SR
    body = sum(gain_of(db) * w ** 2.0 * t * np.exp(-2 * np.pi * w * t) * np.sin(2 * np.pi * hz * t)
               for hz, w, db in modes)
    return signal.oaconvolve(x, body[None] / np.linalg.norm(body), axes=1)[:, :x.shape[1]]


def pair(a, b, same):
    """Two channels that share part of their chance."""
    same = np.clip(same, -1, 1)
    return np.array([a, same * a + np.sqrt(1 - same ** 2) * b])


def scene():
    """Pack, hands and toy with their short tail, the knocks, the room and the faint tone."""
    near = snaps() + ports(rustle() + wheel() + ticks())
    return near + desk(near) + thumps() + room() + faint_tone()


def record(dry):
    """The brief dip, a soft ceiling and the band limit."""
    s, width, db = DIP
    dipped = dry * gain_of(db * np.exp(-((np.arange(N) / SR - s) / width) ** 2))
    limited = np.tanh(dipped / 1.2) * 1.2
    lowpass = signal.firwin(401, EDGE_HZ, window=("kaiser", 9), fs=SR)
    return signal.oaconvolve(limited, lowpass[None], "same")


dry = scene()
out = record(dry)
log_audio(out)
```